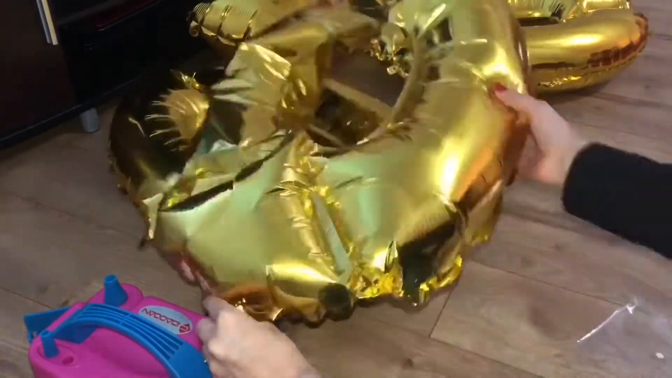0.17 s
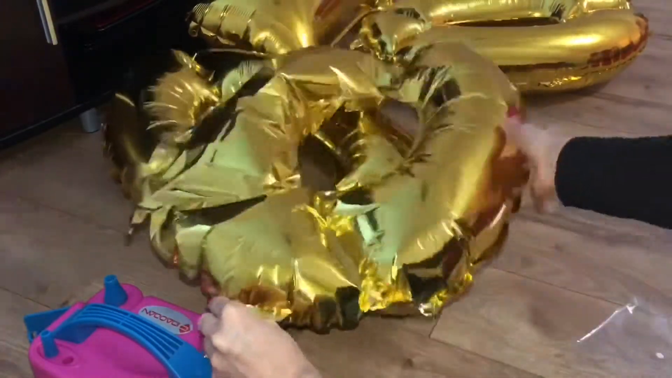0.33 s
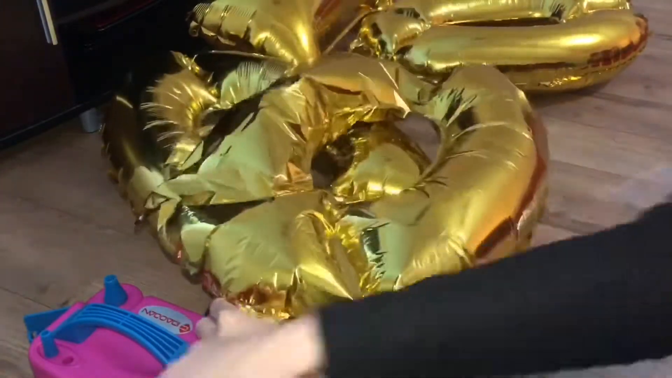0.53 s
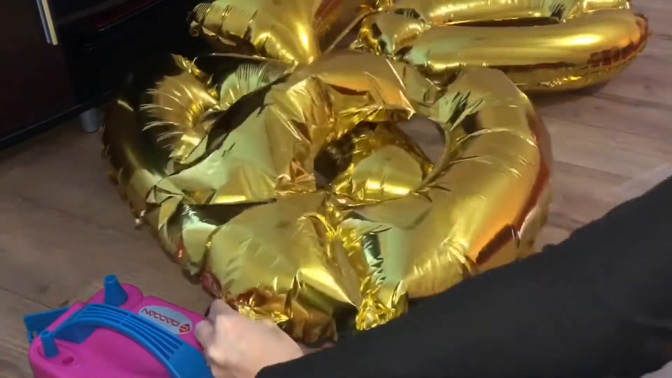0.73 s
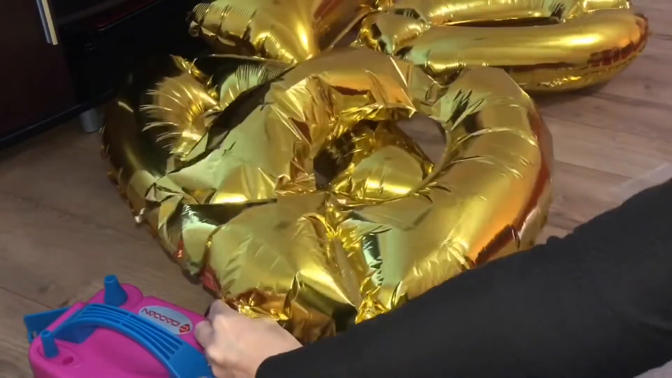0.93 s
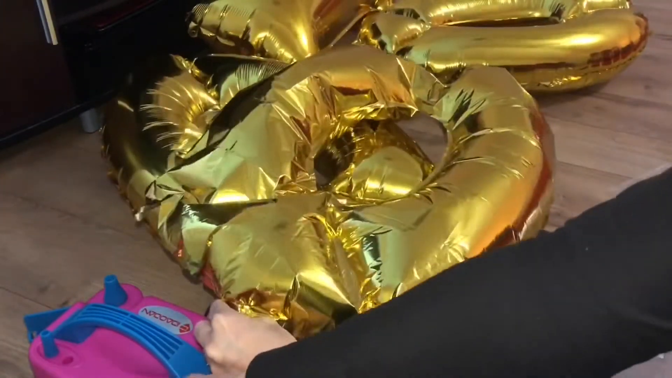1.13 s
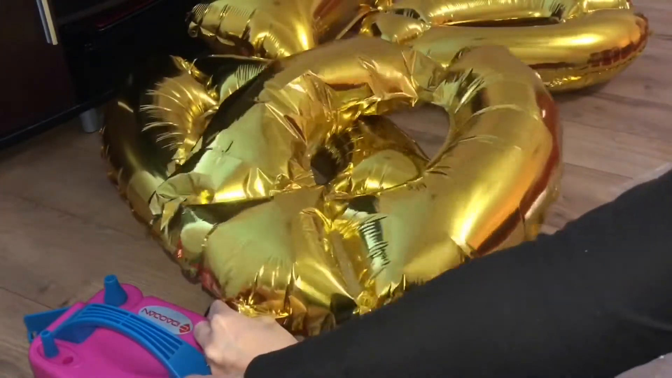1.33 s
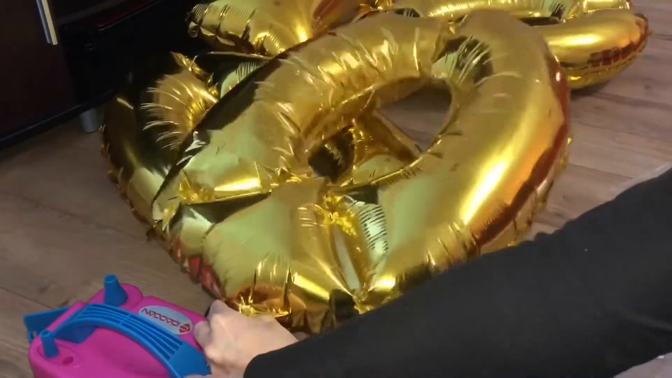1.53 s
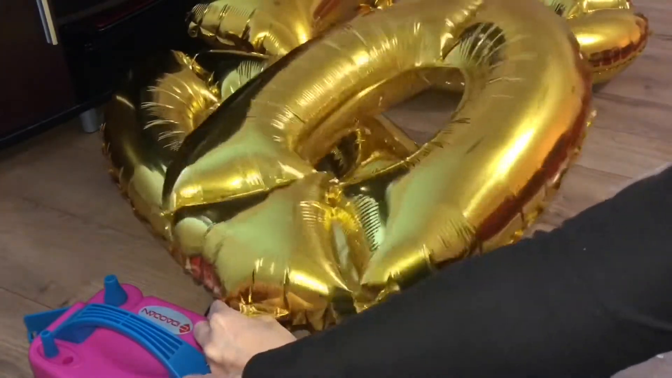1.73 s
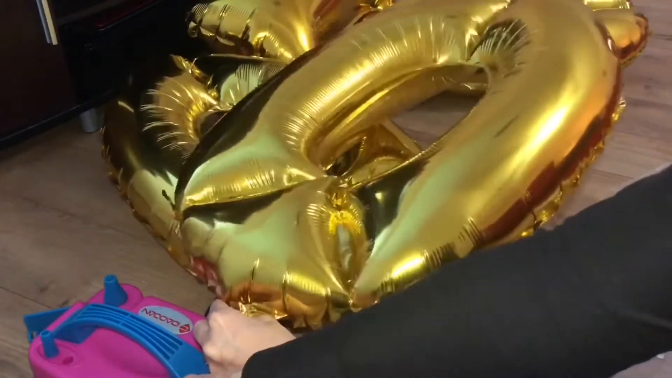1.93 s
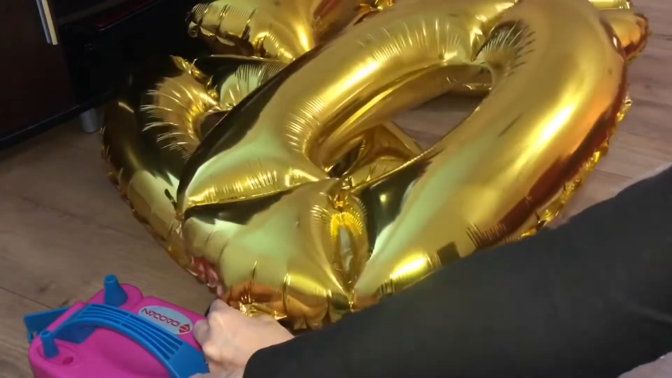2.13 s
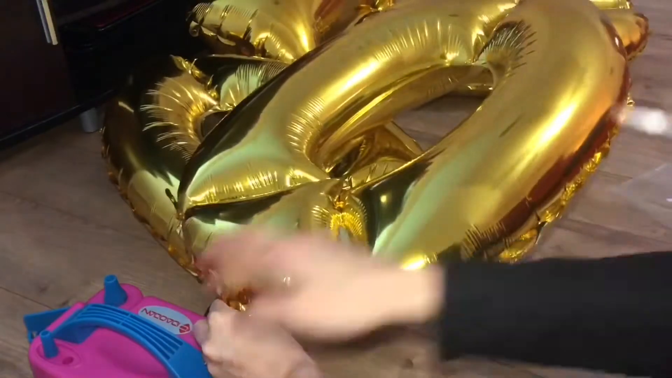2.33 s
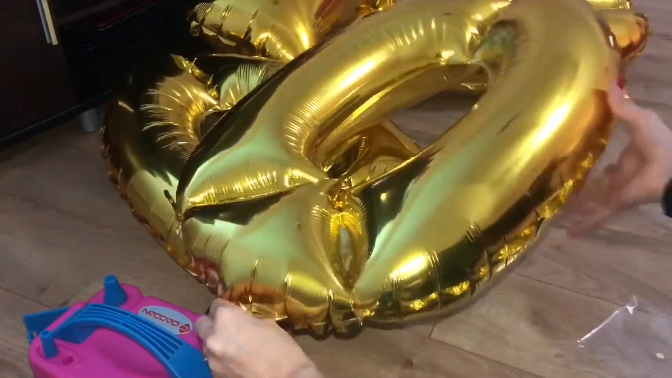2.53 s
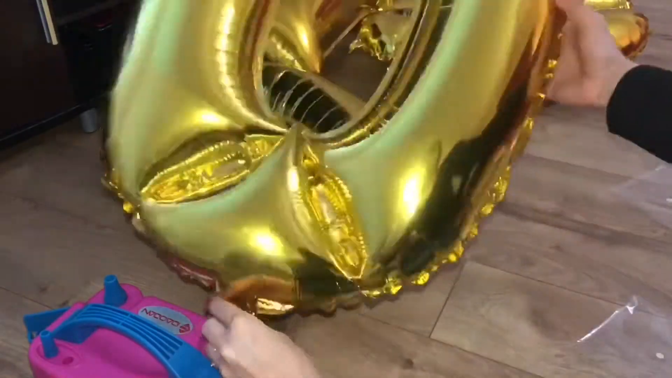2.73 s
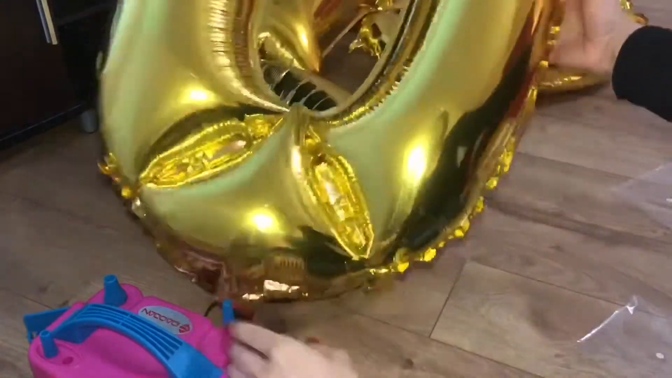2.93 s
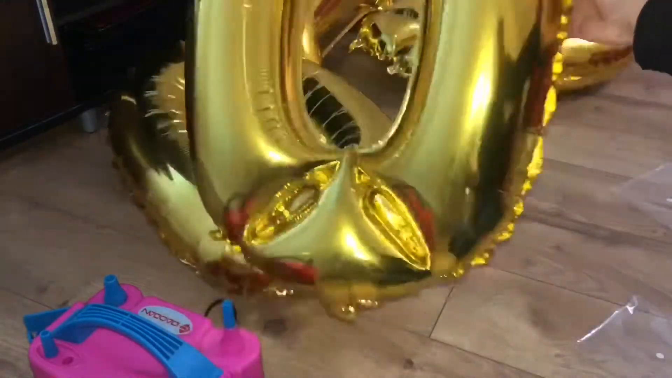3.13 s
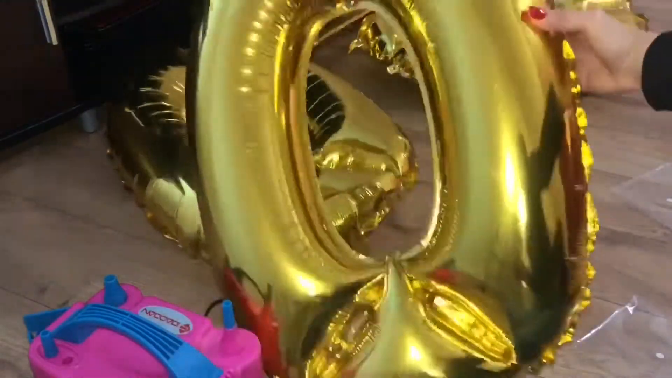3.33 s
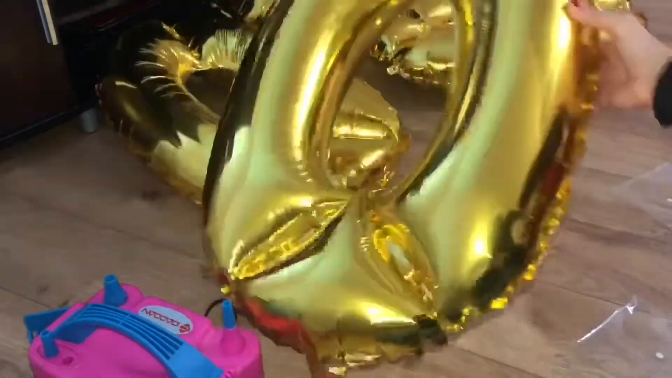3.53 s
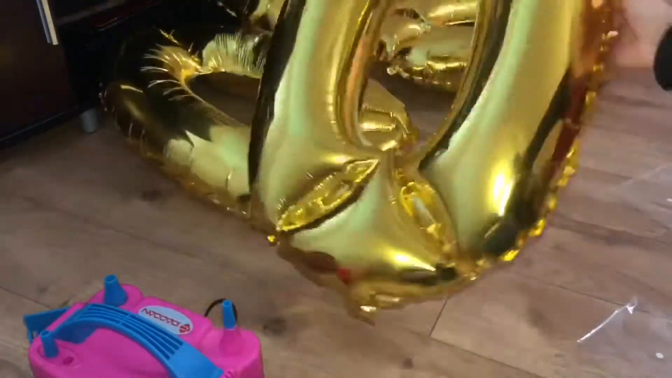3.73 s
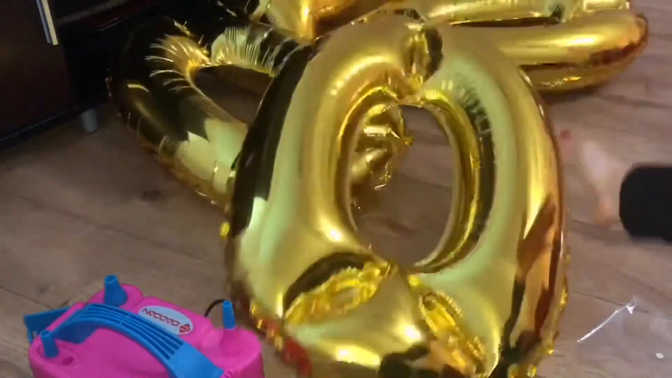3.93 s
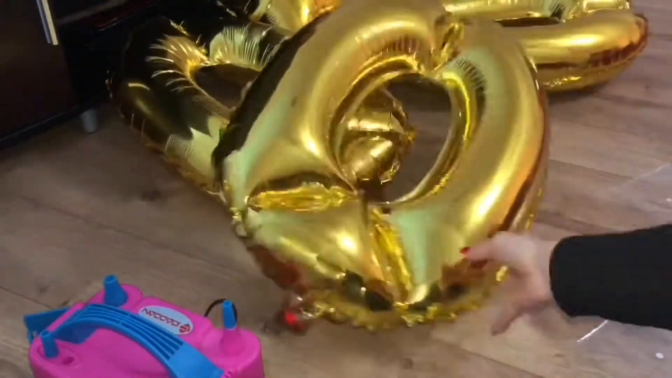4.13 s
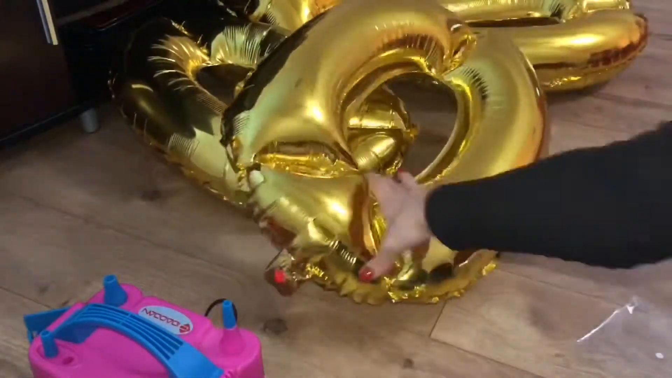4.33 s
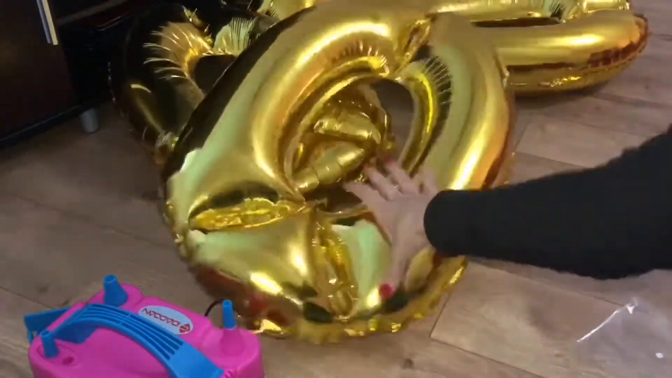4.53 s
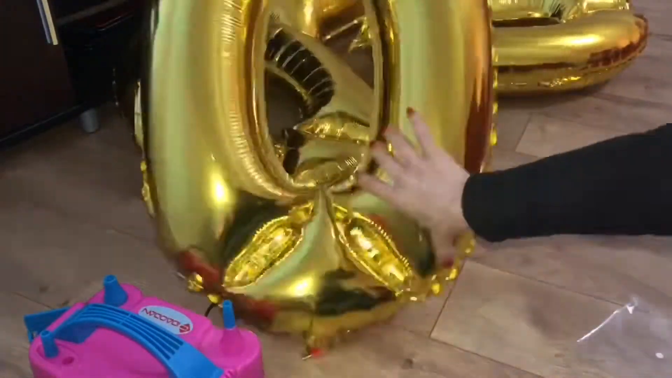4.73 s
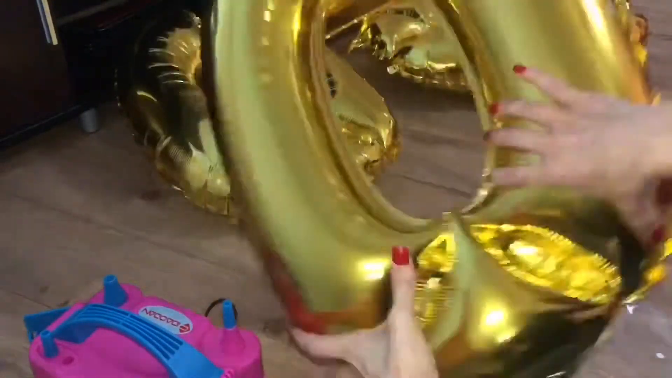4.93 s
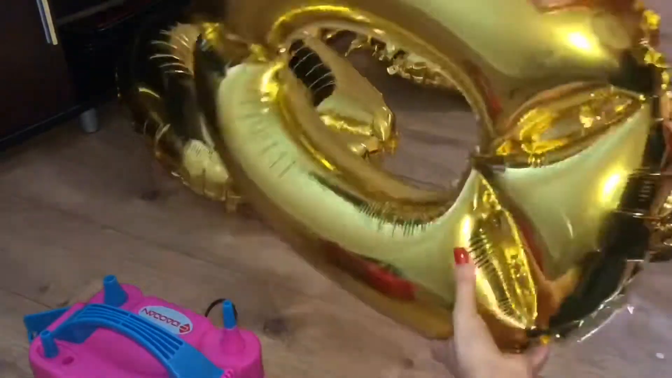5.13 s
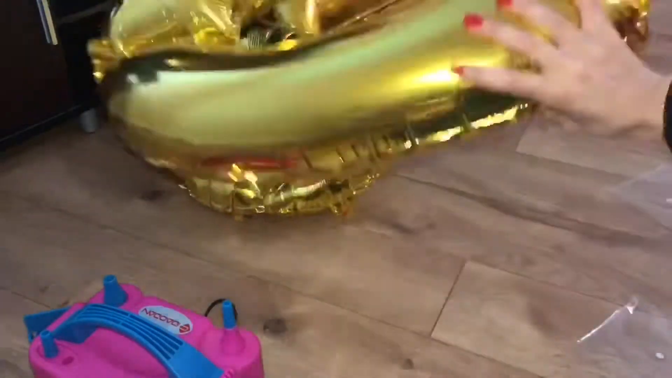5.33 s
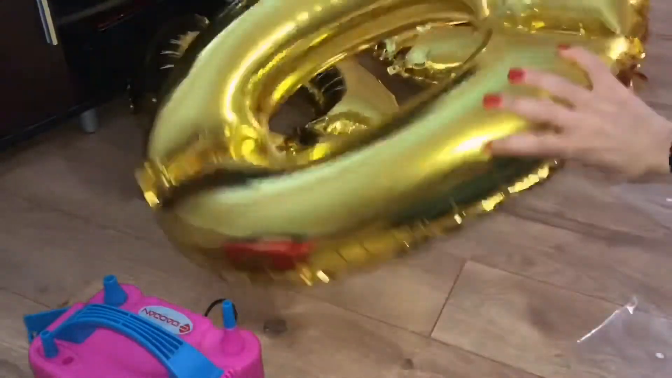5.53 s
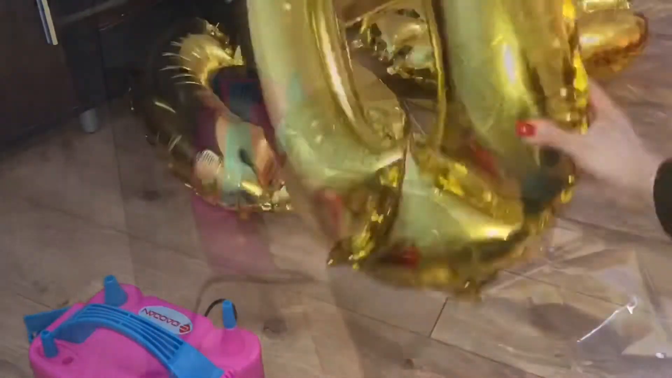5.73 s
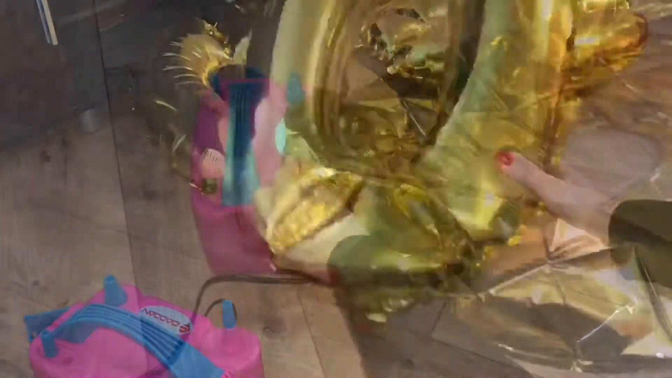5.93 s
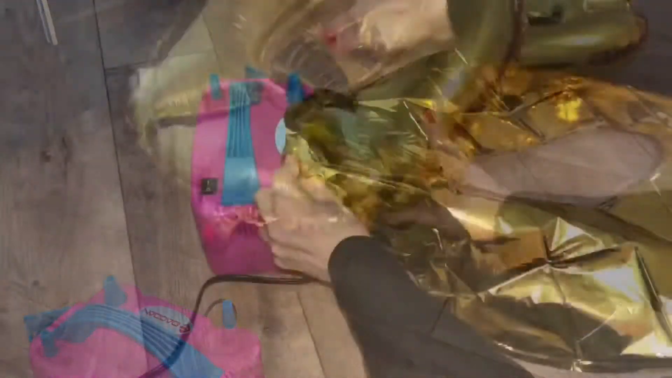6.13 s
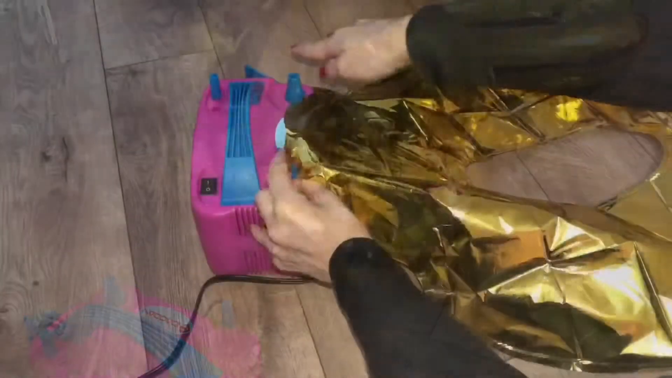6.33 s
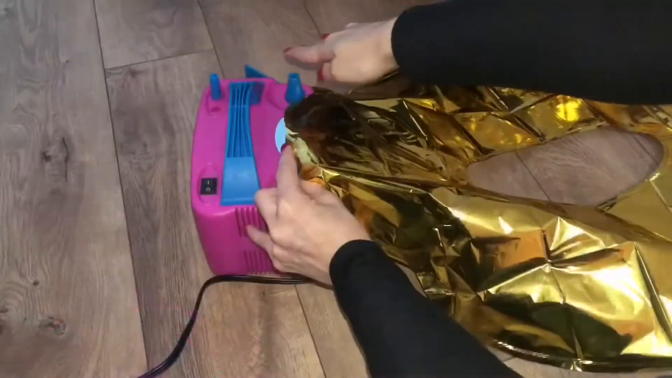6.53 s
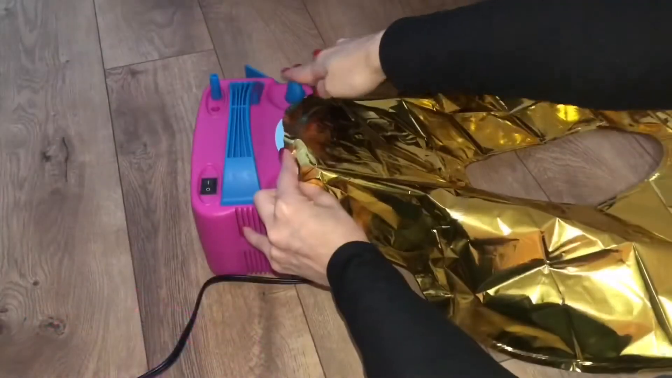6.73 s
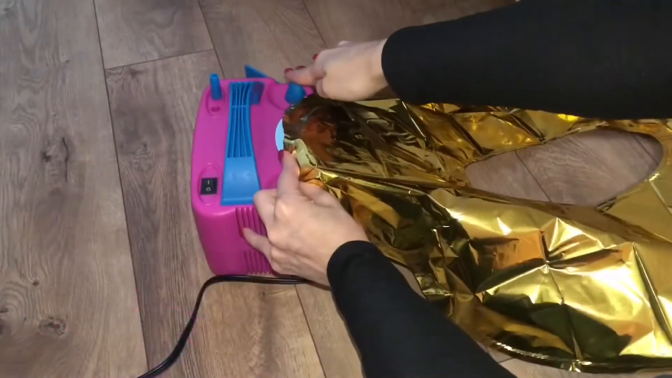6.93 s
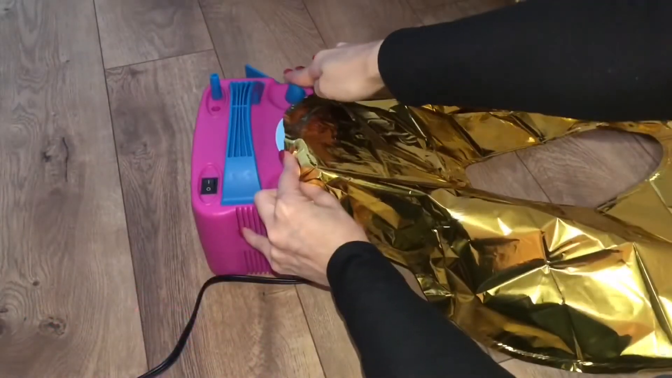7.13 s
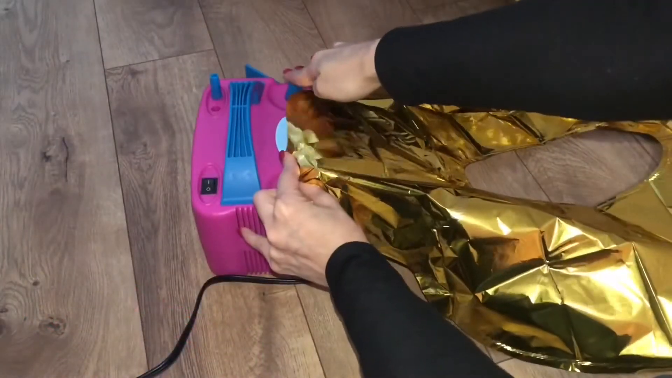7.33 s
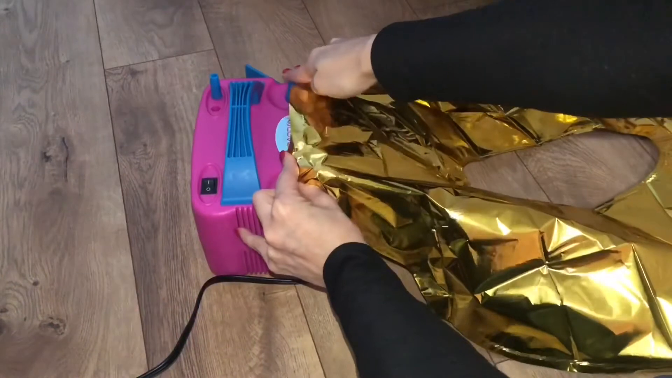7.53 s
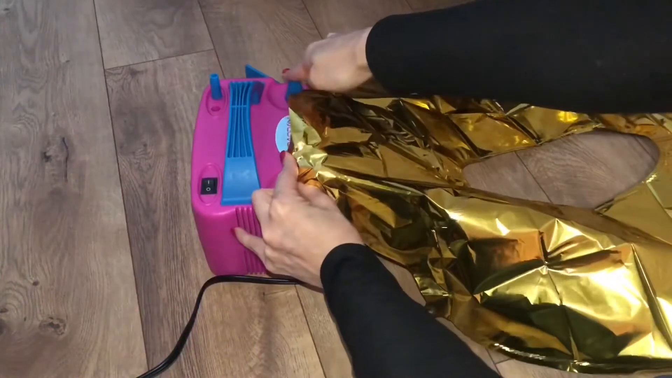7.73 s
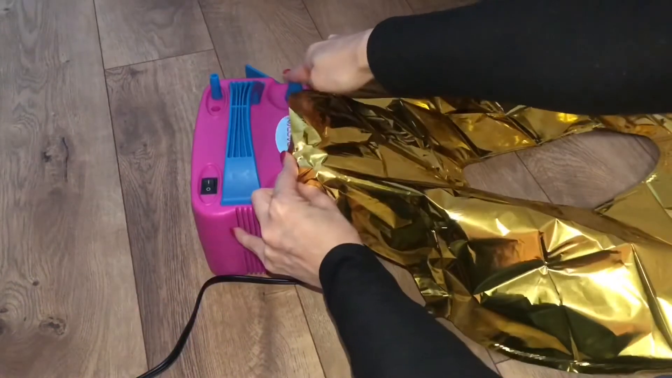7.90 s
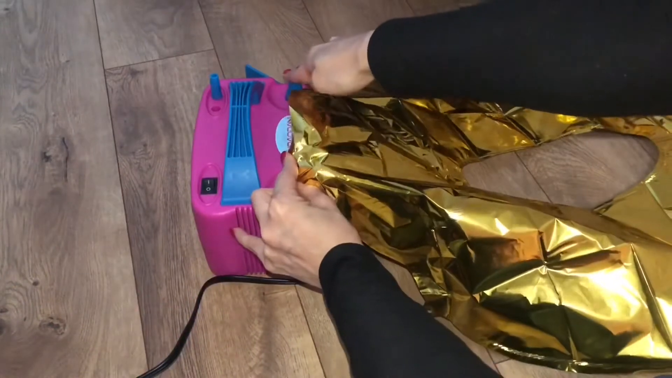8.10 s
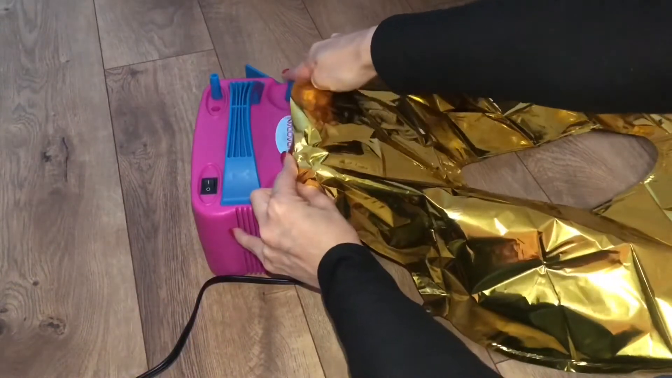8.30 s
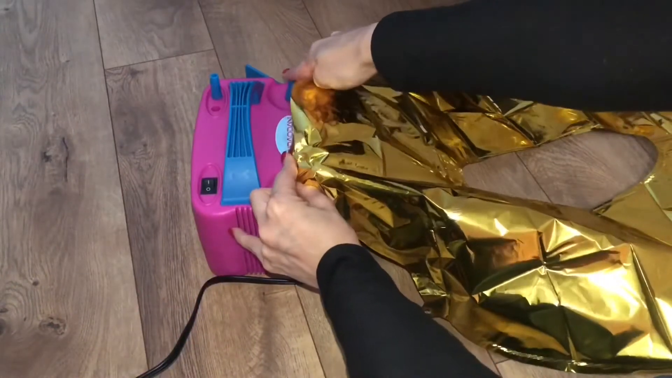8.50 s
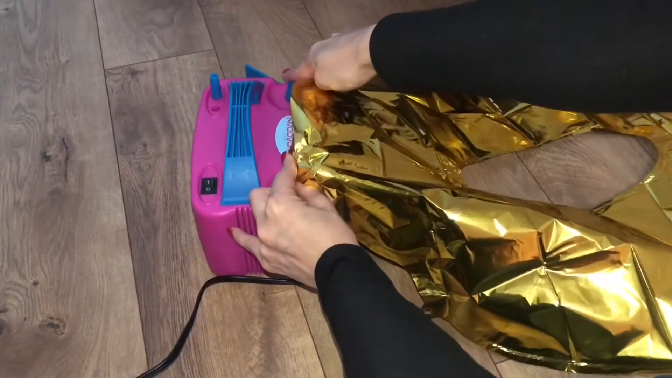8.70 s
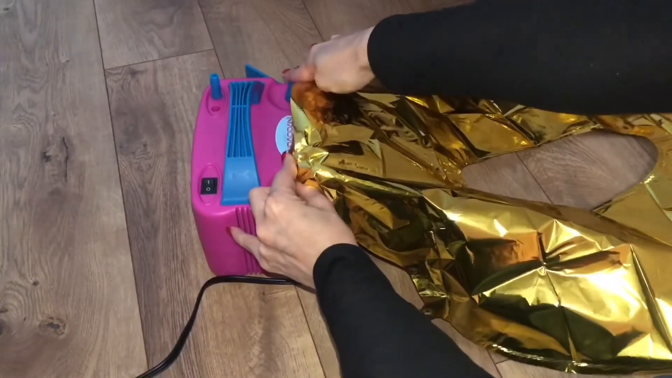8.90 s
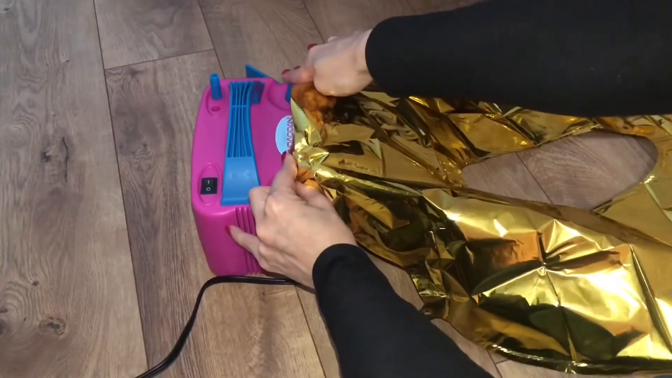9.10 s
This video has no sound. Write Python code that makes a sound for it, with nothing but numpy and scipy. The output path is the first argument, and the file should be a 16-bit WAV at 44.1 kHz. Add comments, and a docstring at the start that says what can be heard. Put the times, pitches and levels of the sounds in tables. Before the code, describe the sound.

A falling airy whir from a pump opens the scene, with a scrape of slack foil. One strong hissing burst fills the balloon and winds down slowly. Soft knocks, drumming skin and foil crinkles come next, loudest around the middle. After light ticking crackles, three brief motor bursts churn hollowly against a narrow neck, each sagging afterwards. Close, dry indoor pickup with a short echo and faint mains hum.

```python
"""An electric pump, at first coasting down, blows up a foil balloon in one hissing burst and coasts again.
Its shaft speed, from motor pull against drag, drives the tonal orders and the level of each air noise.
The balloon is turned over, rustling and bumping: shaped noise swells with each rub and knock.
An empty one is fitted with small crackles, as decaying clicks; three more presses spin the fan
against its narrow neck with a hollow roar. A short room echo and faint mains hum lie beneath."""
import sys
import numpy as np
from scipy import signal
from scipy.fft import rfft, irfft, next_fast_len
from scipy.io import wavfile
from scipy.ndimage import map_coordinates

SR = 44100
rng = np.random.default_rng(int(sys.argv[2]) if len(sys.argv) > 2 else 0)


def transcribe(signal):
    """Save signal, clipped to [-1, 1], as a 16-bit WAV file at the path in sys.argv[1]."""
    frames = np.atleast_2d(signal).T
    limited = np.clip(frames, -1, 1)
    pcm = np.round(limited * 32767).astype(np.int16)
    wavfile.write(sys.argv[1], SR, pcm)


N = 408366
MAINS_HZ = 60
RATED_SPEED = 690  # turns/s, scales the fall of motor current with speed

# Presses on the switch: on t/s, off t/s, pull at standstill/(turns/s^2), commutator whine level/dB
PRESSES = [(1.194, 2.129, 7093, -34), (7.177, 7.437, 4087, -24.5), (7.977, 8.217, 3739, -21),
           (8.995, 9.3, 3500, -22)]
# What the fan blows into (slack balloon, filling balloon, open nozzle, narrow neck):
# from t/s, air drag at the reference speed/(turns/s^2)
LOADS = [(0, 586), (1.185, 557), (2.95, 726), (6, 114.7)]
NECK_S = LOADS[-1][0]  # from here on the empty balloon chokes the nozzle
# Pump housing resonances: f/Hz, width/Hz, lift when open/dB, lift when choked/dB
HOUSING = [(2044, 260, 5.5, 13.5), (2465, 81, 4.5, 11), (3120, 240, 8, 17.5), (3540, 180, 2.5, 7),
           (5160, 260, 3.5, -2.5), (5690, 160, 0.5, 4.5), (6670, 250, 6.5, -5.5), (8300, 380, 7.5, 3.5),
           (9250, 250, 4, 1), (10200, 500, 5.5, 2), (10970, 300, 3.5, -2), (14300, 1100, 4.5, 1.5)]
# Growth of the coasting fan's vent noise: shaft speed/(turns/s), level/dB
VENT_LEVEL = [(20, -89), (130, -50.5), (300, -33), (500, -23.5), (690, -22)]
# Growth of the choked roar: shaft speed/(turns/s), level/dB
ROAR_LEVEL = [(20, -90), (200, -46), (300, -26), (400, -20.5), (480, -17.5), (600, -14)]
# Spectrum of the fan's air rush, also of the housing rattle: f/Hz, relative density level/dB
FAN_SPECTRUM = [(50, -32), (150, -11), (350, -6.5), (580, -2.5), (740, 2.5), (950, -3.5), (1200, -8.5),
                (1500, -23), (2500, -42.5)]
# Spectrum of scraping contact, of brushes and of seams: f/Hz, relative density level/dB
SCRAPE_SPECTRUM = [(300, -17), (800, 2), (1600, 0), (3500, -6.5), (8000, -18.5), (15800, -33)]


def amp(db):
    """Level to amplitude: 20 dB is a factor of ten."""
    return 10 ** (np.asarray(db) / 20)


def unit(x):
    """Normalisation to an rms of 1."""
    return x / np.sqrt(np.mean(x ** 2) + 1e-20)


def clock():
    """Sampling: the time of every sample in seconds."""
    return np.arange(N) / SR


def along(points, x):
    """Interpolation of (x, value) points on a logarithmic axis."""
    knots, values = np.transpose(points)
    return np.interp(np.log(x + 1), np.log(knots + 1), values)


def wobble(rate):
    """Random modulation: a smooth curve through rate normal draws a second."""
    knots = rng.standard_normal(int(N * rate / SR) + 4)
    return map_coordinates(knots, [clock() * rate])


def filtered(x, response):
    """Linear filtering: the spectrum is multiplied by a response of frequency."""
    size = next_fast_len(N + SR // 2)
    hz = np.fft.rfftfreq(size, 1 / SR)
    return irfft(rfft(x, size) * response(hz), size)[:N]


def rush(spectrum, peaks=(), grain_db=0, ripple_db=0):
    """Broadband source and resonator: noise of rms 1, grain_db clumping it, ripple_db adding weak modes."""
    source = rng.standard_normal(N) * amp(grain_db * wobble(700))
    modes = rng.standard_normal(SR // 140)  # one about every 70 Hz
    mode_hz = np.linspace(0, SR / 2, len(modes))

    def response(hz):
        lift = sum(db / (1 + (2 * (hz - centre) / width) ** 2) for centre, width, db in peaks)
        ripple = ripple_db * np.interp(hz, mode_hz, modes)
        return amp(along(spectrum, hz) + lift + ripple)

    return unit(filtered(source, response))


def flow(speed, levels):
    """Flow noise grows with shaft speed: the gain at this speed."""
    return amp(along(levels, speed))


def held(on, off, rise, fall):
    """Envelope: a linear rise to 1, a hold, and exponential relaxation after off."""
    t = clock()
    return np.clip((t - on) / rise, 0, 1) * np.exp(-np.maximum(t - off, 0) / fall)


def switch(on, off, fall):
    """Switched drive: 1 while the switch is held, relaxing after release."""
    return held(on, off, rise=0.017, fall=fall)


def shaft_speed():
    """Rotational dynamics: motor pull against bearing friction and quadratic air drag, in turns/s."""
    start_speed, pull_fade_speed = 376, 377.6  # turns/s; the pull drops to 1/e at the second
    friction, reference_speed = 80.7, 500  # bearing drag in turns/s^2; speed of the listed air drag
    step = .002  # s
    times = np.arange(0, N / SR + step, step)
    pulls = np.zeros(len(times))
    for on, off, pull, _ in PRESSES:
        pulls += pull * np.clip((times - on) / step, 0, 1) * np.clip((off - times) / step, 0, 1)
    starts, load_drags = np.transpose(LOADS)
    drags = load_drags[np.searchsorted(starts, times, "right") - 1]
    speed, speeds = start_speed, []
    for pull, drag in zip(pulls, drags):
        speeds.append(speed)
        drive = pull * np.exp(-speed / pull_fade_speed)
        braking = friction + drag * (speed / reference_speed) ** 2
        speed = max(speed + step * (drive - braking), 1)
    return np.interp(clock(), times, speeds)


def line(turn, order, rough):
    """Shaft order: a sine at a multiple of the rotation, roughened in phase and level."""
    tone = np.sin(order * turn + rough * wobble(150))
    return tone * amp(5.6 * rough * wobble(90))


def slack():
    """Back pressure: slackness falls from 1 to 0 as the first burst fills the balloon."""
    return np.interp(clock(), PRESSES[0][:2], [1, 0], left=0, right=0)


def unbalance(speed, turn):
    """Forced vibration: a once-a-turn note, and a third order sliding through a chamber resonance."""
    # How the once-a-turn note gets out: f/Hz, level before the slackness cut/dB
    shaft_gain = [(90, -87), (130, -51.5), (180, -42.5), (203, -39), (222, -31.5), (240, -41), (268, -47.5),
                  (305, -41), (370, -42), (440, -34), (485, -29.5), (520, -22.5), (600, -17.5),
                  (660, -23.5), (688, -21)]
    level_db = along(shaft_gain, speed) - 6.5 * slack() + 2.2 * wobble(18)
    shaft = amp(level_db) * line(turn, order=1, rough=0.11)
    resonance = 1 / (1 + ((3 * speed - 775) / 65) ** 2)
    chamber = amp(-37.5) * resonance * line(turn, order=3, rough=.1)
    return shaft + chamber


def blade_note(speed, turn):
    """Blade passing: seven fan blades push the air seven times a turn."""
    # How the blade note gets out: f/Hz, gain/dB
    blade_gain = [(2400, -20), (2800, -12), (3050, 4), (3300, -4.5), (3600, -3), (4050, -7), (4220, 0.5),
                  (4600, -15.5), (4800, 7.5), (5200, -15.5)]
    filling = amp(-16.0 - 12 * slack()) * switch(*PRESSES[0][:2], fall=0.13)
    choked = amp(-16.0) * flow(speed, ROAR_LEVEL)
    push = np.where(clock() < NECK_S, filling * flow(speed, VENT_LEVEL), choked)
    gain = amp(along(blade_gain, 7 * speed) + 2.5 * wobble(28))
    return gain * push * line(turn, order=7, rough=0.38)


def commutator_whine(speed, turn, mains):
    """Commutation: brushes chatter over twelve bars, their force swelling with each mains half wave."""
    # Response of the motor frame: f/Hz, gain/dB
    frame_gain = [(600, -9), (2000, -12), (2850, -3), (3300, -3), (3800, 3.5), (4150, 10), (4500, 0.5),
                  (5000, -8), (5650, -8), (6200, -25), (9000, -28.5)]
    bars = np.zeros(N)
    # uneven bars add the neighbouring orders
    for order, db in [(11, -14), (12, 0), (13, -14), (24, -8)]:
        # two random quadratures smear the order into a narrow band
        band = wobble(450) * np.sin(order * turn) + wobble(450) * np.cos(order * turn)
        chatter = .7 * line(turn, order, rough=.6) + .33 * band
        bars += amp(db + along(frame_gain, order * speed)) * chatter
    press_gain = sum(amp(db) * switch(on, off, fall=0.017) for on, off, _, db in PRESSES)
    return bars * (1 + .5 * mains) * press_gain


def motor(speed):
    """Rotating machinery: shaft orders, and hum, brush noise and rattle that follow the current."""
    turn = 2 * np.pi * np.cumsum(speed * (1 + .002 * wobble(40))) / SR
    mains = np.sin(2 * np.pi * 2 * MAINS_HZ * clock())
    orders = unbalance(speed, turn) + blade_note(speed, turn) + commutator_whine(speed, turn, mains)
    # the motor draws less current as it gains speed
    pressed = sum(switch(on, off, fall=0.022) for on, off, _, _ in PRESSES)
    current = pressed * amp(-18 * (speed / RATED_SPEED) ** 2)
    hum = amp(-30.5) * current * mains
    brush_peaks = [(3100, 400, 8.6), (4100, 600, 11)]  # f/Hz, width/Hz, lift/dB
    brushes = amp(-37.5) * current * rush(SCRAPE_SPECTRUM, brush_peaks, grain_db=1)
    # the pull of the current shakes the housing
    rattle = amp(-36.0) * current * rush(FAN_SPECTRUM, grain_db=2)
    return np.sqrt(2) * (orders + hum) + brushes + rattle


def open_air(speed):
    """Turbulent flow: a jet hisses under power, the housing colours the coasting air, the fan rushes."""
    # The nozzle under power: f/Hz, relative density level/dB
    jet_spectrum = [(530, -38), (900, -4), (1120, -2), (1560, -2), (2580, -4), (4940, -3), (10300, -2.5),
                    (15800, -7)]
    # The coasting fan: f/Hz, relative density level/dB
    vent_spectrum = [(700, -39), (1100, -9), (1450, -3.5), (1900, -2.5), (2800, -3.5), (4000, -1.5),
                     (6000, -1.5), (11000, -4.5), (12300, -6), (15800, -7)]
    # Growth of the jet: shaft speed/(turns/s), level/dB
    jet_level = [(130, -49), (300, -32.5), (500, -18), (580, -14.5), (690, -16)]
    # Growth of the fan rush: shaft speed/(turns/s), level/dB
    fan_level = [(10, -85), (60, -63), (135, -48), (300, -39.5), (690, -27.5)]
    on, off, _, _ = PRESSES[0]
    drive = switch(on, off, fall=0.031)
    peaks = [(hz, width, db) for hz, width, db, _ in HOUSING]
    vent = flow(speed, VENT_LEVEL) * rush(vent_spectrum, peaks, grain_db=1.0, ripple_db=2.5)
    jet = flow(speed, jet_level) * rush(jet_spectrum, grain_db=0.5, ripple_db=1.5)
    fan = flow(speed, fan_level) * rush(FAN_SPECTRUM)
    # crossfade in power between jet and vent
    stream = np.sqrt(drive) * jet + np.sqrt(1 - drive) * vent
    return (clock() < NECK_S) * (stream * amp(.3 * wobble(30)) + fan)


def choked_air(speed):
    """Choked flow: against the narrow neck the air churns in the fan chamber and flutters."""
    # Churning in the chamber: f/Hz, relative density level/dB
    roar_spectrum = [(30, -62), (70, -22.5), (130, -22), (190, -16.5), (260, -29.5), (310, -14),
                     (410, -10.5), (540, -2.5), (690, -0.5), (805, -17), (865, -4.5), (980, -6),
                     (1080, -9.5), (1180, -27), (2000, -52.5)]
    # Hiss at the neck: f/Hz, relative density level/dB
    neck_spectrum = [(700, -35), (1300, 8.5), (1700, -0.5), (2350, -5.5), (2750, -3.5), (3600, 1.5),
                     (4600, -1.5), (5700, 3.5), (6900, 0.5), (8400, 2), (11000, 2.5), (12500, -3),
                     (15800, -0.5)]
    # Growth of the neck hiss: shaft speed/(turns/s), level/dB
    neck_level = [(20, -85), (400, -28), (600, -18.5)]
    flutter = wobble(130)
    churn = unit(rush(roar_spectrum, grain_db=0.5) * amp(0.47 * flutter))
    peaks = [(hz, width, db) for hz, width, _, db in HOUSING]
    hiss = rush(neck_spectrum, peaks, grain_db=0.5, ripple_db=2.5)
    neck = unit(hiss * amp(0.35 * flutter))
    return (clock() > NECK_S) * (flow(speed, ROAR_LEVEL) * churn + flow(speed, neck_level) * neck)


def foil():
    """Friction and buckling: rubbed foil crinkles in clumps, its seam slides, and it squeaks once."""
    # Hands rubbing the foil: t/s, length/s, skin level/dB, crinkle level/dB (before clumping)
    rubs = [(3.866, .06, -50, -48), (3.952, 0.045, -49.5, -55), (4.048, 0.106, -55, -55),
            (4.153, .08, -59, -56), (4.25, 0.052, -55, -66), (4.407, 0.16, -48.5, -45.5),
            (4.583, .2, -51.5, -51.5), (4.822, .03, -59, -59), (4.978, 0.034, -46, -49.5),
            (5.07, 0.026, -34.5, -46), (5.12, 0.099, -53, -53.5), (5.228, 0.026, -44, -55.5),
            (5.296, .05, -61.5, -60), (5.39, .03, -63, -65), (5.473, .025, -45, -64),
            (5.53, 0.016, -54, -49.5), (5.6, 0.07, -66, -60.5), (5.714, 0.051, -57.5, -60.5),
            (5.849, 0.035, -54.5, -56), (5.933, 0.039, -60, -57), (6.194, 0.022, -59.5, -65.5),
            (6.3, 0.086, -61.5, -69)]
    # Rubbed skin: f/Hz, relative density level/dB
    skin_spectrum = [(60, -10), (150, 3.5), (255, -3), (340, -2), (520, 0), (950, -3.5), (1400, -3.5),
                     (2300, -11), (4000, -29.5)]
    # Buckling foil: f/Hz, relative density level/dB
    crinkle_spectrum = [(1180, -14.5), (2000, -3), (2380, 0.5), (7770, -4.5), (11700, -12), (15000, -10),
                        (15800, -19)]
    # Quick slides of the loose seam: centre t/s, half length/s, level before clumping/dB
    slides = [(3.899, .035, -45.5), (4.539, .02, -44.5), (4.828, 0.011, -49.5)]
    # Sliding seam: f/Hz, relative density level/dB
    swish_spectrum = [(1000, -28.5), (4000, 2), (10000, -1.5), (15800, -7)]
    # Foil slipping on the nozzle: f/Hz, width/Hz, lift/dB
    squeak_peaks = [(4300, 350, 25), (5280, 180, 29)]
    skin, crinkle = np.zeros(N), np.zeros(N)
    for s, length, skin_db, crinkle_db in rubs:
        stroke = held(s, s + length, rise=0.35 * length, fall=0.033)
        skin += amp(skin_db) * stroke
        crinkle += amp(crinkle_db) * stroke
    clumps = amp(1.7 * wobble(70))
    rubbing = skin * rush(skin_spectrum, grain_db=1.5)
    buckles = crinkle * rush(crinkle_spectrum, grain_db=3.5, ripple_db=1.5)
    sliding = sum(amp(db) * np.exp(-((clock() - s) / length) ** 2) for s, length, db in slides)
    swish = sliding * rush(swish_spectrum, grain_db=-0.5)
    slip = amp(-68.5 + 2 * wobble(60)) * held(7.055, 7.115, rise=.013, fall=.012)
    squeak = slip * rush(crinkle_spectrum, squeak_peaks)
    return clumps * (rubbing + buckles + swish) + squeak


def bumps():
    """Contact excitation: soft knocks sway the balloon, drum on its skin and scrape its seams."""
    # Bumps on the balloon, the first while it is still slack:
    # t/s, swell/s, sway level/dB, drum level/dB, scrape level/dB
    knocks = [(.06, 0.089, -60, -52, -33), (3.36, .014, -63, -43, -41.5), (3.515, 0.021, -63, -41, -39),
              (3.67, 0.015, -63, -52, -48), (3.985, 0.031, -61.5, -48, -49), (4.05, 0.037, -51, -47, -58),
              (4.2, 0.045, -55, -48.5, -63), (4.63, .022, -44.5, -58, -52), (4.996, 0.0146, -37, -40, -45),
              (5.055, 0.016, -35, -44, -44), (5.088, 0.01, -27, -29.5, -35),
              (5.185, 0.021, -39, -45, -59.5), (5.245, 0.017, -53.5, -41, -42),
              (5.498, 0.013, -51, -30.5, -43), (5.55, .008, -58, -57, -41), (5.77, 0.022, -52.5, -55, -53)]
    # Swaying: f/Hz, relative density level/dB
    sway_spectrum = [(20, -20), (45, -4), (72, 14), (110, 5.5), (220, -39.5)]
    # Drumming skin: f/Hz, relative density level/dB
    drum_spectrum = [(80, -13), (155, 6.5), (260, -0.5), (370, 4.5), (600, -1.5), (900, -10.5),
                     (2000, -38.5)]
    sway, drum = rush(sway_spectrum), rush(drum_spectrum)
    scrape = rush(SCRAPE_SPECTRUM, grain_db=2.5)
    out = np.zeros(N)
    for s, swell, sway_db, drum_db, scrape_db in knocks:
        contact = (1 + ((clock() - s) / swell) ** 2 / 2) ** -2.0
        out += contact * (amp(sway_db) * sway + amp(drum_db) * drum + amp(scrape_db) * scrape)
    return out


def snaps():
    """Impulsive release: creases and the switch click sharply, with a fast and a slow decay."""
    # Creases and the switch: t/s, relative level/dB
    clicks = [(6.2687, -46), (6.3682, -37.5), (6.5254, -58), (6.6135, -41.5), (6.7004, -50.5),
              (6.7347, -42), (6.772, -40.5), (6.7922, -51), (6.8244, -51), (6.8723, -49), (6.9476, -57),
              (7.1735, -33)]
    # Click colour: f/Hz, relative density level/dB
    snap_spectrum = [(500, -8), (2000, 0), (4500, 3.5), (8000, -5), (15800, -2)]
    t = np.arange(SR // 10) / SR
    # each part falls 60 dB in the time given, in seconds
    decay = amp(-60 * t / 0.0092) + amp(-24.5 - 60 * t / 0.12)
    out = np.zeros(N)
    for s, db in clicks:
        out[round(s * SR):][:len(t)] += amp(db - 1.5) * decay
    return out * rush(snap_spectrum, grain_db=-1.0)


def room(x):
    """Diffuse reverberation: a short answer of the furnished room, thin in the bass."""
    t = np.arange(SR // 3) / SR
    tail = rng.standard_normal(len(t)) * amp(-60 * t / 0.23) * (t > .005)  # 60 dB in 0.23 s
    echo = signal.fftconvolve(x, tail / np.linalg.norm(tail))[:N]
    return filtered(echo, lambda hz: hz / np.hypot(hz, 800))


def background():
    """Ambient noise: quiet room air with a faint hum at twice the mains frequency."""
    # Room air: f/Hz, relative density level/dB
    air_spectrum = [(20, -30.5), (45, -12.5), (80, -13), (150, -8.5), (200, -16.5), (425, -16.5),
                    (800, -29), (1040, -25), (1250, -30), (4500, -43.5), (9000, -48), (15800, -59)]
    hum = amp(-58 + 2.9 * wobble(3.7)) * np.sin(2 * np.pi * 2 * MAINS_HZ * clock())
    return amp(-58.0) * rush(air_spectrum) + hum


def scene():
    """Superposition: pump, balloon and room, alike in both channels."""
    speed = shaft_speed()
    tones = motor(speed)
    handling = foil() + bumps() + snaps()
    # the motor frame's resonance is heard through the room
    frame = amp(-7.0) * filtered(tones, lambda hz: 1 / (1 + ((hz - 4150) / 450) ** 2))
    echo = room(amp(-9) * handling + amp(-9.5) * tones + frame)
    mono = tones + open_air(speed) + choked_air(speed) + handling + echo + background()
    return np.array([mono, mono])


def record(dry):
    """Band limiting: a linear 200 Hz ramp about the top frequency, nothing above it."""
    top_hz = 15850
    response = lambda hz: np.clip((top_hz - hz) / 200 + .5, 0, 1)
    return np.array([filtered(channel, response) for channel in dry])


dry = scene()
out = record(dry)
transcribe(out)
```